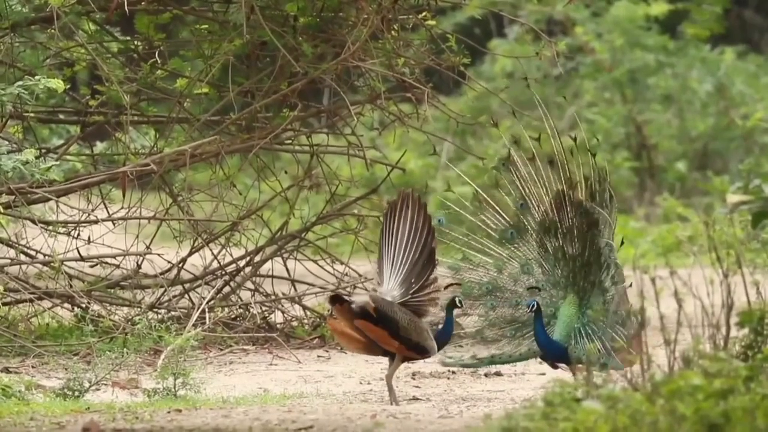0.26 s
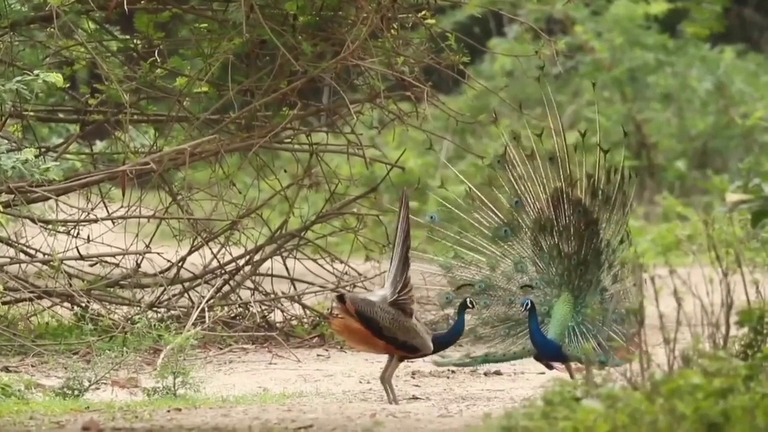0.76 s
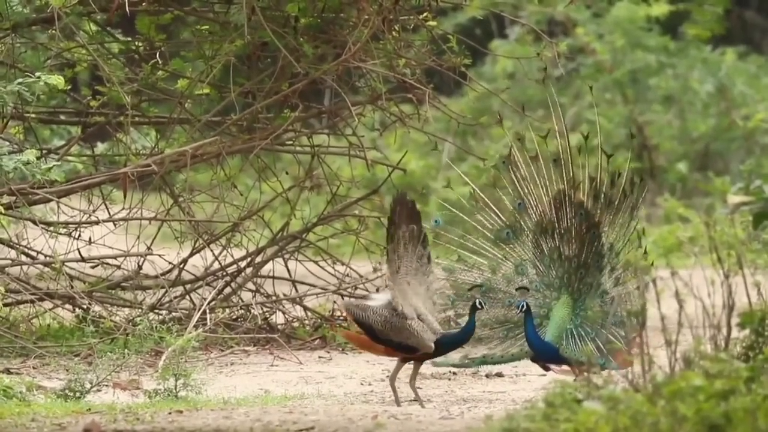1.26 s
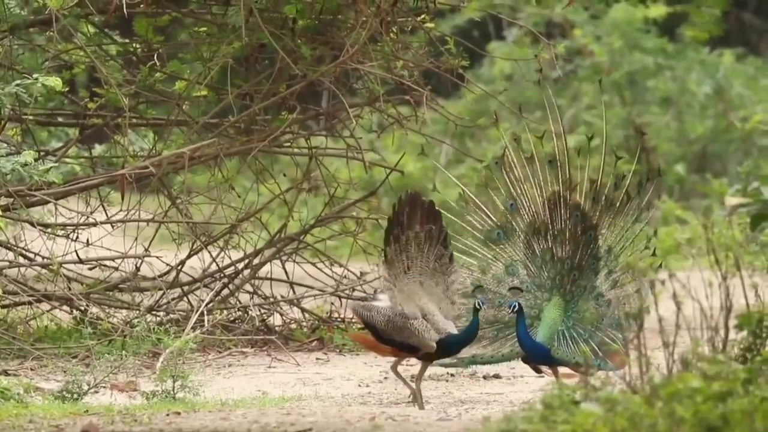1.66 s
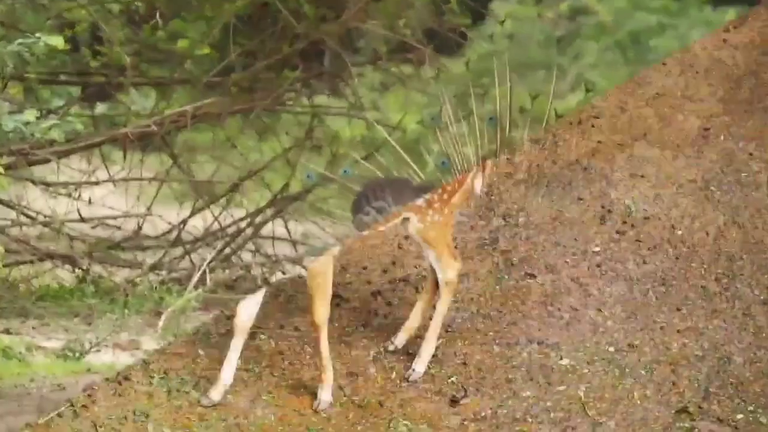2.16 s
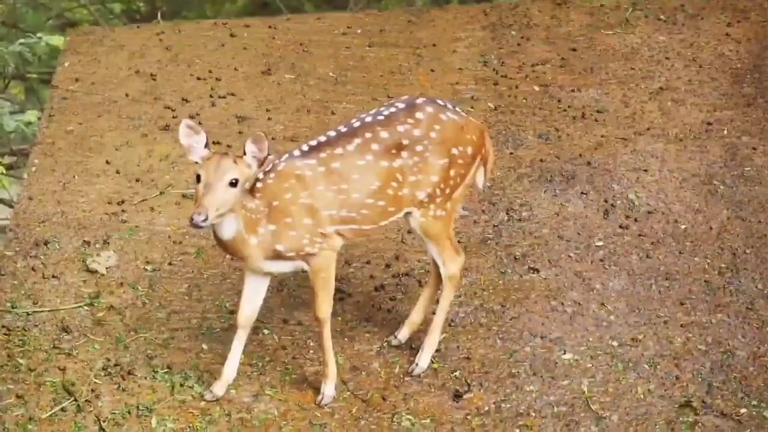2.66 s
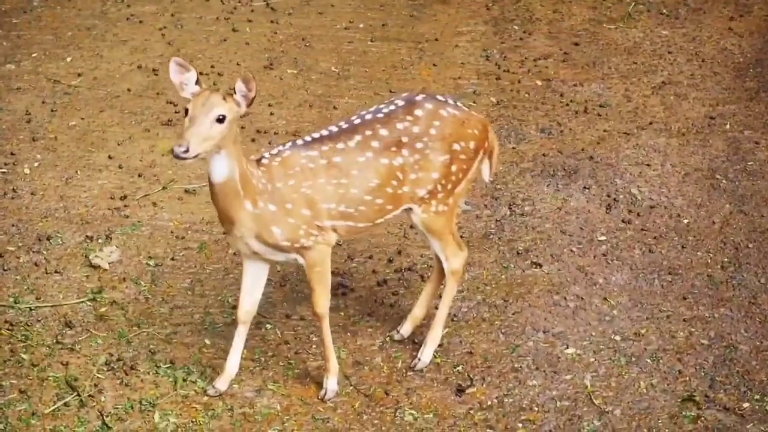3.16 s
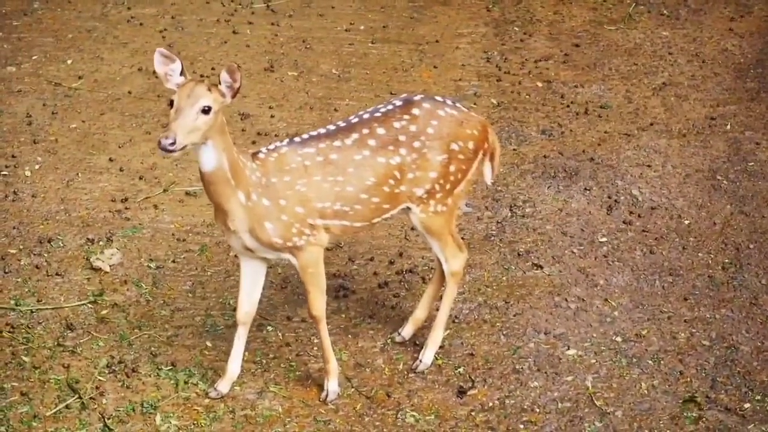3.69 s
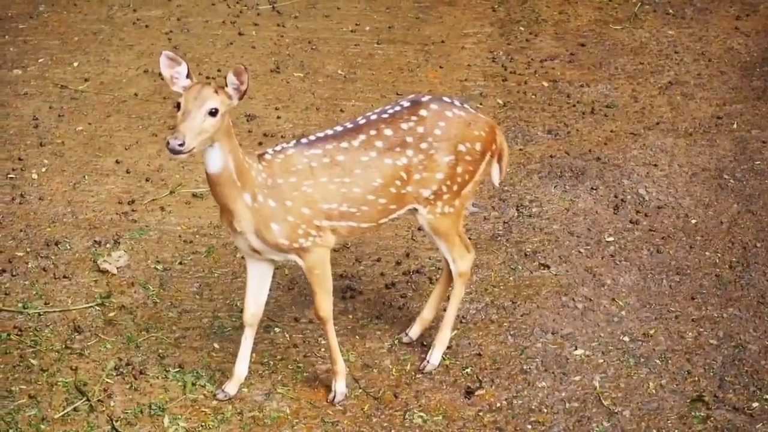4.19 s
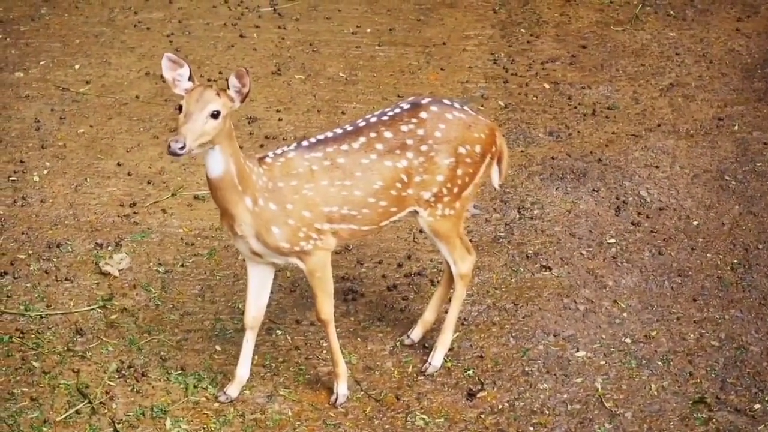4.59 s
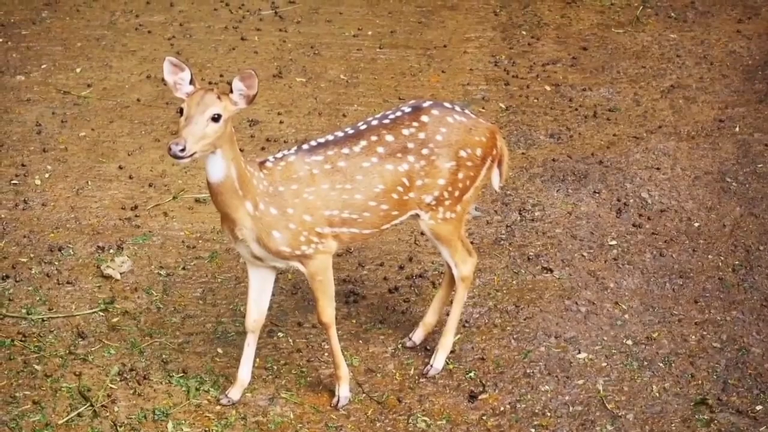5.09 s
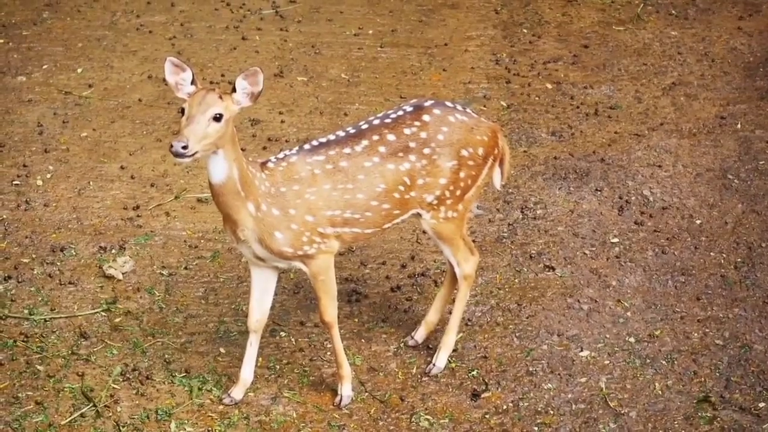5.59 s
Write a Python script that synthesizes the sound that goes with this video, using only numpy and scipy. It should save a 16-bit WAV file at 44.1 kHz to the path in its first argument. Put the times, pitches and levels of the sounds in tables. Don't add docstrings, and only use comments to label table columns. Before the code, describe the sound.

Outdoors in open scrub, a peacock gives a short lower note and then one loud, reedy, arching wail, over soft air and distant traffic. Two faint clucks, a far dove and thin cricket trills sit around it. The scene fades to silence. Then a wood cuts in with low, dull air, and a stag roars twice, creaky at first, then harsh, with long echoes. Wide stereo pair.

```python
import sys
import numpy as np
from scipy import signal
from scipy.fft import rfft, irfft
from scipy.io import wavfile
from scipy.ndimage import uniform_filter1d, minimum_filter1d

SR = 44100
rng = np.random.default_rng(int(sys.argv[2]) if len(sys.argv) > 2 else 0)


def wrap_up_sound(samples):
    columns = np.atleast_2d(samples).T
    tamed = np.clip(columns, -1, 1)
    steps = np.round(tamed * 32767).astype(np.int16)
    wavfile.write(sys.argv[1], SR, steps)


def attenuation_scalar(level_db):
    decades = np.asarray(level_db, float) / 20
    return 10 ** decades


N = 257984
CUT_IN_S = 2.827


def evened(x):
    return x / np.sqrt(np.mean(x ** 2) + 1e-20)


def levelled(x, size=2000):
    return x / np.sqrt(uniform_filter1d(x ** 2, size) + 1e-12)


def read(points, hz):
    f, value = np.transpose(points)
    return np.interp(np.log(hz + 1), np.log(f + 1), value)


def bump(x, width):
    return np.exp(-(x / width) ** 2)


def wander(count, size):
    noise = uniform_filter1d(rng.standard_normal(count), size)
    return evened(uniform_filter1d(noise, size))


def add(mix, s, sound):
    part = mix[round(s * SR):][:len(sound)]
    part += sound[:len(part)]


def resonate(x, hz, width):
    turn = np.exp(2j * np.pi * np.cumsum(hz * np.ones(len(x))) / SR)
    r = np.exp(-np.pi * width / SR)
    return 2 * (turn * signal.lfilter([1 - r], [1, -r], x / turn)).real


def colour(x, gain):
    wide = np.pad(x, (0, 4096), "reflect")
    return irfft(rfft(wide) * gain(np.fft.rfftfreq(len(wide), 1 / SR)), len(wide))[..., :len(x)]


# frequency in Hz with the larynx up, the same with it down, width in Hz,
# level in dB with the larynx up, halfway and down.
THROAT = [(440, 340, 66, -11.5, -14, -20.5), (648, 391, 56, -2, -9.5, -2), (888, 484, 51, 1, -2.5, -5),
          (1294, 863, 60, -4, 5.5, -3), (1420, 1000, 62, -5, -19.5, -7.5), (1575, 1260, 67, 4, -1, -10),
          (1678, 1520, 82, -3, -12.5, -14), (1963, 1800, 47, 1.5, -17.5, -24),
          (2300, 1980, 68, -17.5, -10.5, -16), (2420, 2290, 58, -13.5, -24.5, -19)]
TREBLE = [(2893, 2550, 120, 10, 5, -8.5), (3121, 3150, 55, -0.5, 9, -6), (3366, 3350, 120, 11.5, 4, -9.5),
          (3640, 3650, 180, -2.5, 1, -13.5), (4220, 4050, 91, -20.5, -14.5, -13),
          (4380, 4420, 150, -38.5, -36, -18)]
TOP = [(4930, 4750, 280, 1.5, 6.5, -5), (5500, 5250, 220, -10, -13.5, 2.5), (5900, 5600, 190, 9.5, -4, -7),
       (6650, 6300, 550, -16, -1, -4), (7600, 7300, 780, -16.5, -15, -12.5),
       (8800, 8600, 900, -24.5, -5.5, -14.5)]
TREBLE_DB = [-12.5, -13.5, -30.5]
HISS_DB = [-46, -46.5, -43.5]
# pitch in Hz, level over the effort in dB.
CHEST = [(108, -10.5), (118, -18), (133, -21.5), (150, -20.5), (165, -6.5), (200, -0.5)]
# time in seconds,
# half length in seconds, brightening in dB, pitch lift in Hz, chest change in dB.
HEAVES = [
    (3.632, 0.038, 5.5, 0, -1),
    (3.675, 0.012, -7.5, 0.5, -16),
    (3.886, 0.017, -4.5, 0, -2),
    (3.926, 0.022, 9, 0, 3.5),
    (4.079, 0.022, 10, 0, 0.5),
    (4.117, 0.013, -6, 0, -4),
    (4.232, 0.016, -1.5, -1, -4),
    (4.37, .04, -2.5, 40.5, 7),
    (5.585, 0.04, 13.5, 0, -0.5),
    (5.705, 0.048, 6.5, 0.5, 3.5),
]
# time in seconds, share of roughness kept.
CLEAR_SPELL = [(4.01, 1), (4.03, .16), (4.085, .18), (4.17, 1)]
# time in seconds, half length in seconds, centre in Hz, width in Hz, level in dB.
SNORT = (5.575, .03, 9000, 2500, -60)
SNAP_HZ = [550, 2100]


def roar(stages, pull, effort, pitch):
    start, settled, breaking, broken, end = stages
    pull_start, pull_length, extra_height = pull
    t = np.arange(start, end, 1 / SR)
    heave_db, lift_hz, choke_db = sum(np.outer(what, bump(t - s, half)) for s, half, *what in HEAVES)

    late = (t - broken).clip(0)
    hz = np.interp(t, *np.transpose(pitch)) + lift_hz - 62 * late - 48 * late ** 2
    slide = np.clip((t - pull_start) / pull_length, 0, 1)
    pulled = slide ** 2 * (3 - 2 * slide)

    alternate = 0.3 * np.clip((settled - t) / (settled - start), 0, 1) ** .5
    rough = 0.04 + 0.16 * np.clip((settled - t) / .03 + 1, 0, 1)
    rough = rough + 0.47 * np.clip((t - breaking) / (broken - breaking), 0, 1) ** .7 + 0.55 * late
    rough = np.clip(rough * np.interp(t, *np.transpose(CLEAR_SPELL)), 0, .8)

    effort_db = np.interp(t, *np.transpose(effort))
    chest_db = effort_db + read(CHEST, hz) + choke_db
    chest_db = chest_db - 15 * bump(t - start, 0.077)
    mouth_db = effort_db + 0.21 * heave_db
    treble_db = effort_db + np.interp(pulled, [0, .5, 1], TREBLE_DB) + heave_db - 10 * bump(t - start, 0.045)
    top_db = effort_db + np.interp(pulled, [0, .5, 1], HISS_DB) + 0.32 * heave_db

    turns = np.cumsum(hz * (1 + .02 * rough * wander(len(t), size=250))) / SR
    uneven = np.maximum.accumulate(turns + .3 * rough ** 2 * wander(len(t), size=120))
    cycle = uneven.astype(int)
    strength = (1 - alternate * (cycle % 2)) * attenuation_scalar(3.5 * rough * rng.standard_normal(1000)[cycle])
    pulses = strength * np.exp(-((uneven % 1 - .5) * SR / hz / 1.2) ** 2)
    puffs = strength * (0.39 + np.exp(-(uneven % 1) / 0.9)) * rng.standard_normal(len(t))
    drive = (1 - rough) * evened(pulses) + .6 * rough ** 1.5 * evened(puffs)

    damped = 0.75 * (1 - pulled)
    since_closure_s = ((uneven - .5) % 1) / hz
    damping = uniform_filter1d(1 - damped + damped * np.exp(-since_closure_s / .003), size=12)

    def through(tract, leak_db, drive=drive):
        out = 0
        skirt = attenuation_scalar(leak_db - 17 * pulled ** .4 + 6 * rough)
        for k, (up_hz, down_hz, width, *level_db) in enumerate(tract):
            shake = 1 + 0.03 * rough * wander(len(t), size=2500)
            ring_hz = (up_hz + (down_hz - up_hz) * pulled) * shake
            ring_hz = ring_hz * (1 + extra_height * (1 - pulled) * (up_hz < 1800))
            sway_db = 4.5 * rough * wander(len(t), size=1500)
            ring = resonate(drive, ring_hz, 0.88 * width)
            ring = resonate(ring, ring_hz, width) + skirt * resonate(ring, ring_hz, 6 * width)
            gain = attenuation_scalar(np.interp(pulled, [0, .5, 1], level_db) + sway_db)
            out = out + (-1) ** k * gain * ring / np.sqrt(width)
        return levelled(out * damping)

    meets = np.clip((hz - 125) / 40, .12, 1)
    chest = meets * np.sin(2 * np.pi * turns) + (1 - meets) * np.sin(4 * np.pi * turns)
    breath = resonate(resonate(puffs, 205, 56), 205, 56)
    chest += 0.57 * rough ** 3 * evened(breath)
    chest = levelled(chest) * attenuation_scalar(2.5 * rough * wander(len(t), size=400))

    bright = attenuation_scalar(treble_db) * through(TREBLE, 11.0) + attenuation_scalar(top_db) * through(TOP, -9.5, puffs)
    snap = signal.sosfilt(signal.butter(5, SNAP_HZ, "band", fs=SR, output="sos"), pulses)
    snap = -attenuation_scalar(-6) * (1 - pulled) ** 2 * levelled(snap)
    s, half, snort_hz, width, db = SNORT
    snort = resonate(resonate(puffs, snort_hz, width), snort_hz, width)
    bright += attenuation_scalar(db) * bump(t - s, half) * evened(snort)
    return t[0], attenuation_scalar(chest_db) * chest + attenuation_scalar(mouth_db) * (through(THROAT, 15.0) + snap) + bright


# start, end of creak, start of breaking, fully broken and end, in seconds.
ROARS = [
    (3.015, 3.15, 3.38, 3.72, 4.5),
    (4.973, 5.19, 5.62, 5.79, 5.95),
]
# start in seconds, length in seconds, extra height at rest as share of resonance
PULLS = [
    (3.174, .43, 0.093),
    (5.232, .46, 0.019),
]
# time in seconds, level in dB.
EFFORTS = [
    [(3.018, -54), (3.124, -28), (3.422, -18.5), (3.54, -13), (3.9, -14), (4.14, -16.5), (4.33, -19),
     (4.4, -20), (4.5, -69.5)],
    [(4.973, -45), (5.047, -31), (5.177, -27), (5.419, -23), (5.503, -19), (5.587, -17.5), (5.661, -13.5),
     (5.72, -17), (5.85, -13)],
]
# time in seconds, pitch in Hz.
PITCHES = [
    [(3.014, 55), (3.06, 57), (3.075, 106), (3.135, 111), (3.165, 125), (3.33, 126), (3.425, 146),
     (3.495, 194), (3.72, 206)],
    [(4.973, 55), (5.02, 56), (5.045, 90), (5.11, 115.5), (5.345, 114.3), (5.497, 119.5), (5.661, 134),
     (5.713, 157.9), (5.787, 165.5)],
]


def stag():
    out = np.zeros(N + SR // 10)
    for call in zip(ROARS, PULLS, EFFORTS, PITCHES):
        add(out, *roar(*call))
    return out


# time in seconds, pitch in Hz, effort in dB, beak resonance in Hz.
NOTES = [
    [(0.235, 587, -61.5, 1420), (0.251, 604, -30, 1600), (0.301, 637.6, -24, 1710),
     (0.36, 636.4, -25, 1890), (0.388, 642.3, -22.5, 1920)],
    [(0.417, 748, -24, 1420), (0.451, 783, -21, 1340), (0.505, 822, -20.5, 1389), (0.589, 865, -21, 1260),
     (0.72, 873.6, -19, 1260), (0.823, 859.4, -19, 1700), (0.911, 846.3, -18, 1707),
     (0.99, 811.3, -23.5, 1576), (1.103, 648.4, -27, 1830)],
]
PARTIALS_DB = [-2, -1.5, -6]
# frequency in Hz, level in dB.
WINDPIPE = [(2300, -4), (3300, -12), (3900, -7.5), (4500, -14), (5300, -9), (6500, -9), (8000, -12),
            (9700, -8.5), (12000, -13.5), (14000, -19.5), (15800, -35)]
# time in seconds, depth as a share.
RASP = [(.24, .03), (.38, .08), (.42, 0.7), (.6, 0.65), (.72, 0.064), (.92, 0.054), (1.02, 0.54),
        (1.14, 0.87)]


def peacock():
    release_s, release_db = .037, -37.5
    s, *columns = np.vstack(NOTES).T
    t = np.arange(s[0], s[-1] + release_s, 1 / SR)
    hz, effort_db, beak_hz = (np.interp(t, s, c) for c in columns)
    hz = uniform_filter1d(hz, size=300)
    effort_db = effort_db + release_db * np.maximum(t - s[-1], 0) / release_s
    phase = 2 * np.pi * np.cumsum(hz * (1 + .001 * wander(len(t), size=200))) / SR

    low = 0
    for k, db in enumerate(PARTIALS_DB, 1):
        beak_db = 12 * bump(k * hz - beak_hz, 400)
        null_db = -15 * bump(k * hz - 1.555 * beak_hz, 130)
        low = low + attenuation_scalar(effort_db + db + beak_db + null_db) * np.sqrt(2) * np.sin(k * phase)

    high_db = effort_db - 6.5 - 9 * (860 - hz).clip(0) / 250 + 4.5 * (t < NOTES[0][-1][0])
    dull_db = 9 * (880 - hz) / 250
    rasp = np.interp(t, *np.transpose(RASP)) * wander(len(t), size=25)
    high = 0
    for k in range(4, 20):
        gain = attenuation_scalar(read(WINDPIPE, k * hz) - dull_db * (k - 4) / 4 + 3.8 * wander(len(t), size=300))
        flutter = 1 + rasp * min(((k - 3) / 7) ** 2, 1)
        high = high + gain * flutter * np.sin(k * (phase - 1))
    out = np.zeros(N)
    add(out, s[0], (low + attenuation_scalar(high_db) * levelled(high)) * signal.windows.tukey(len(t), .02))
    return out


# start in seconds, pitch in Hz, level in dB.
CLUCKS = [
    (.66, 601.3, -32.5),
    (.77, 605, -34.5),
]
# start in seconds, length in seconds, pitch in Hz, level in dB.
COOS = [
    (1.027, 0.11, 244, -42.5),
    (1.336, .22, 233, -48.5),
]


def fowl():
    out, t = np.zeros(N), np.arange(0, .03, 1 / SR)
    for s, hz, db in CLUCKS:
        add(out, s, attenuation_scalar(db) * np.hanning(len(t)) * np.sin(2 * np.pi * hz * (1.15 * t - 4.2 * t ** 2)))
    for s, length, hz, db in COOS:
        t = np.arange(0, length, 1 / SR)
        add(out, s, attenuation_scalar(db) * np.hanning(len(t)) * np.sin(2 * np.pi * hz * t))
    return out


# start in seconds, length in seconds, level in dB.
TRILLS = [
    (0, .17, -58),
    (1.263, .11, -52.5),
    (1.504, .04, -69),
    (1.928, .03, -71),
    (2.062, .08, -53.5),
]


def cricket():
    strokes = np.zeros(N)
    for s, length, db in TRILLS:
        strokes[np.round(np.arange(s, s + length, 1 / 39) * SR).astype(int)] = attenuation_scalar(db)
    t = np.arange(0, .014, 1 / SR)
    chirp = np.hanning(len(t)) * np.sin(2 * np.pi * (5700 * t - 30000 * t ** 2))
    return signal.oaconvolve(strokes, chirp)[:N]


def echoes(x, decays, start):
    taps = np.zeros((2, SR))
    slots = np.arange(start, SR - 20, 20)
    at = slots + rng.integers(0, 20, (2, len(slots)))
    np.put_along_axis(taps, at, rng.choice([-1., 1.], at.shape), 1)
    hz, t, z = signal.stft(taps, SR, nperseg=256)
    tail = signal.istft(z * attenuation_scalar(-60 * t / read(decays, hz)[:, None]), SR, nperseg=256)[1]
    tail = tail + 0.22 * tail[::-1]
    return signal.fftconvolve(x[None], tail / np.linalg.norm(tail[0]), axes=1)[:, :N]


def heard(x, pair, wet, decays, start):
    lead, balance = pair
    side = np.array([[.5], [-.5]])
    direct = colour(x, lambda hz: attenuation_scalar(side * read(balance, hz)) * np.exp(1j * side * read(lead, hz)))
    return direct[:, :N] + echoes(colour(x, lambda hz: attenuation_scalar(read(wet, hz))), decays, start=start)


# frequency in Hz, shared part.
SAME = [(60, 0.53), (180, 0.53), (550, 0.7), (1650, 0.69), (4970, 0.004), (15000, 0.21)]


def air(spectrum, db, patchy_db):
    frames, hz = N // 256 + 5, np.fft.rfftfreq(1024, 1 / SR)
    a, b, c, d, patches = rng.standard_normal((frames, 513, 5)).T
    patches = evened(uniform_filter1d(uniform_filter1d(patches, 10, 0), 14, 1))
    same = np.clip(read(SAME, hz), -1, 1)[:, None]
    left = a + 1j * b
    z = np.array([left, same * left + np.sqrt(1 - same ** 2) * (c + 1j * d)])
    z *= attenuation_scalar(read(spectrum, hz)[:, None] + patchy_db * patches)
    return attenuation_scalar(db) * evened(signal.istft(z, nperseg=1024, noverlap=768)[1][:, :N])


def wind_filter(hz):
    return 1 / (1 + (70 / (hz + 1)) ** 6)


# frequency in Hz, left minus right in dB.
STAG_PAIR = [
    [(0, -1), (2410, 1), (2670, 0.5), (3100, 0.96), (3960, 1.65), (5000, 1.5), (12100, 1.1), (14500, -1.5), (15500, -9)],
    [(60, -9), (120, 0), (240, -3.5), (480, 5), (950, 0.5), (1890, 4), (3770, 5), (7520, -2), (15000, 2)],
]
# frequency in Hz, level in dB.
WOOD_WET = [(150, -11), (450, -6.5), (1000, -19), (3000, -1.5)]
# frequency in Hz, time to fall 60 dB in seconds.
WOOD_ECHO = [(150, 0.68), (230, 0.36), (330, 1.4), (500, 1), (1000, 1.7), (2000, 1.5), (6000, .6)]
# frequency in Hz, density in dB per Hz.
WOOD = [(40, -54), (75, 0), (120, -7.5), (310, -4.5), (590, -13.5), (1000, -15.5), (1550, -19),
        (3000, -30.5), (6000, -39), (10000, -43), (15500, -51)]


def wood():
    call = heard(colour(stag(), wind_filter), STAG_PAIR, WOOD_WET, WOOD_ECHO, start=300)
    background = np.array([colour(x, wind_filter) for x in air(WOOD, -45.5, patchy_db=2.5)])
    hush_db = -3 * bump(np.arange(N) / SR - CUT_IN_S, 0.22)
    return call + attenuation_scalar(hush_db) * background


BIRD_PAIR = [
    [(0, 1.5), (3880, -0.04), (4220, 0.9), (4650, 0.5), (5860, 2.2), (8180, 3.5), (10200, 1.5), (14000, 4), (15500, 5)],
    [(60, 12), (150, -5), (380, 1.5), (950, -2.5), (2380, -0.5), (5980, -3.5), (15000, 4)],
]
# frequency in Hz, level in dB.
SCRUB_WET = [(500, -12.5), (1500, -10), (3000, 0), (6000, 0.5), (12000, -2.5)]
# frequency in Hz, time to fall 60 dB in seconds.
SCRUB_ECHO = [(300, 0.71), (1500, 0.57), (5000, 0.31), (12000, 0.19)]
# frequency in Hz, density in dB per Hz.
SCRUB = [(15, -59), (25, -23.5), (79, -6), (169, -14), (233, -6), (297, -14.5), (445, -8.5), (537, -10),
         (919, -3.5), (1240, -9.5), (1660, -11.5), (3830, -31.5), (15500, -38)]


def scrub():
    birds = heard(peacock() + fowl(), BIRD_PAIR, SCRUB_WET, SCRUB_ECHO, start=150)
    return birds + cricket() + air(SCRUB, -37.5, patchy_db=1.5)


def scene():
    t = np.arange(N) / SR
    fade_from_s, fade_to_s = 1.517, 2.23
    fade = np.clip((fade_to_s - t) / (fade_to_s - fade_from_s), 0, 1)
    return scrub() * fade + wood() * (t >= CUT_IN_S)


def top_cut(x):
    return signal.sosfilt(signal.butter(12, 15910, fs=SR, output="sos"), x)


def record(dry):
    room = minimum_filter1d(1 / np.maximum(abs(dry).max(0), 1), size=401)
    return top_cut(dry * uniform_filter1d(room, size=201))


dry = scene()
out = record(dry)
wrap_up_sound(out)
```